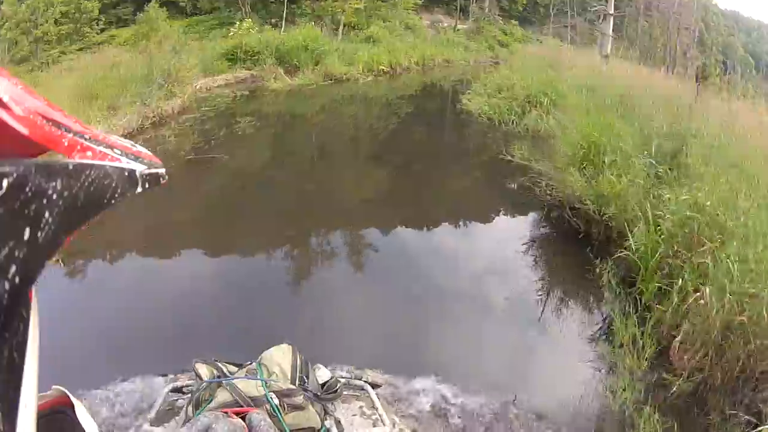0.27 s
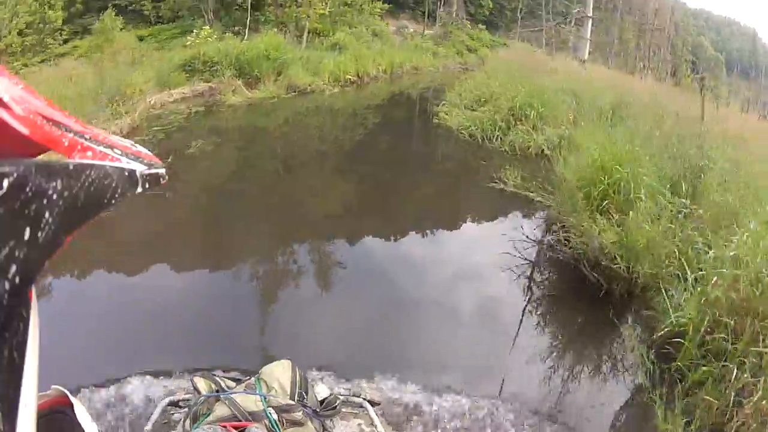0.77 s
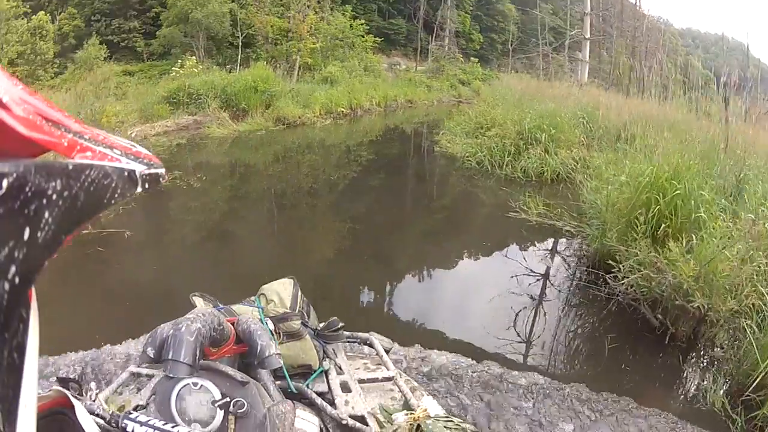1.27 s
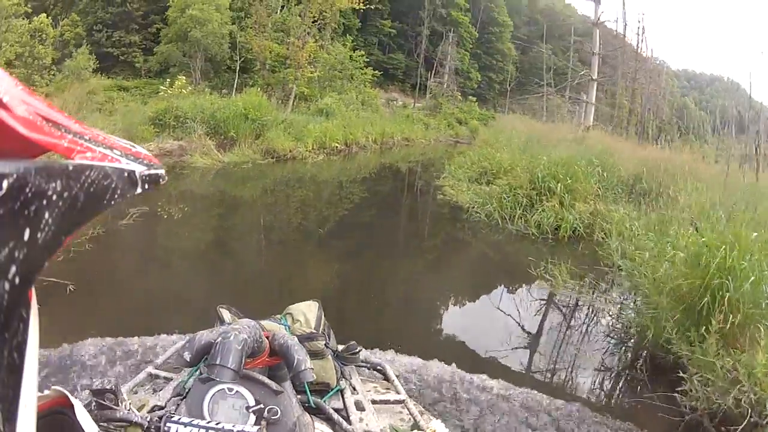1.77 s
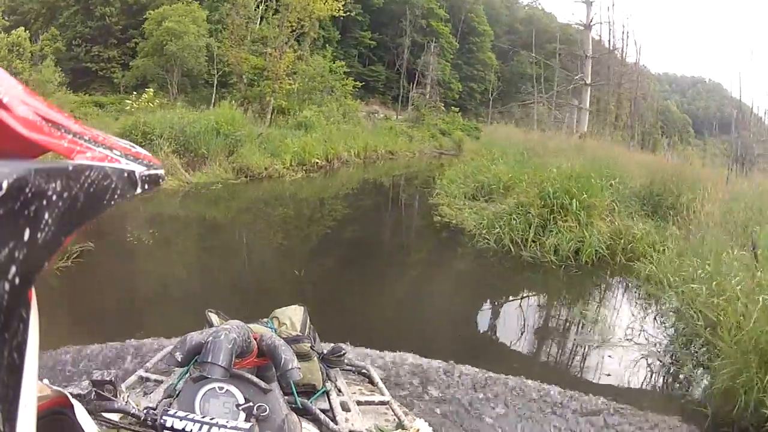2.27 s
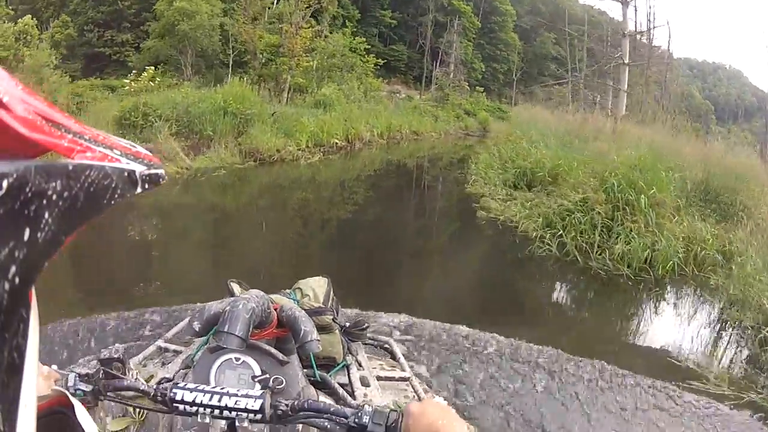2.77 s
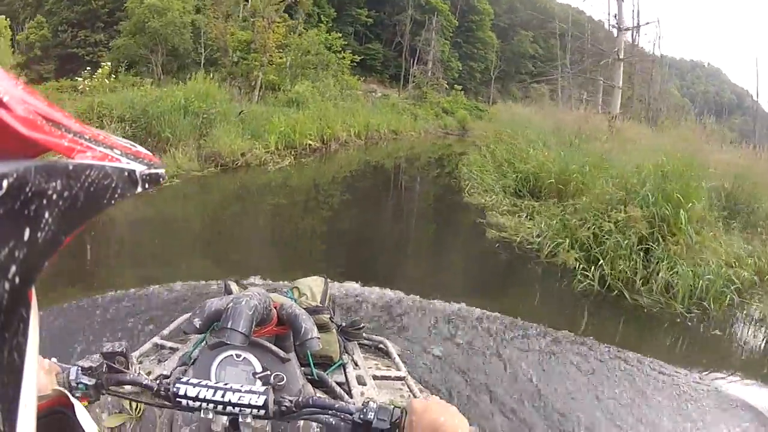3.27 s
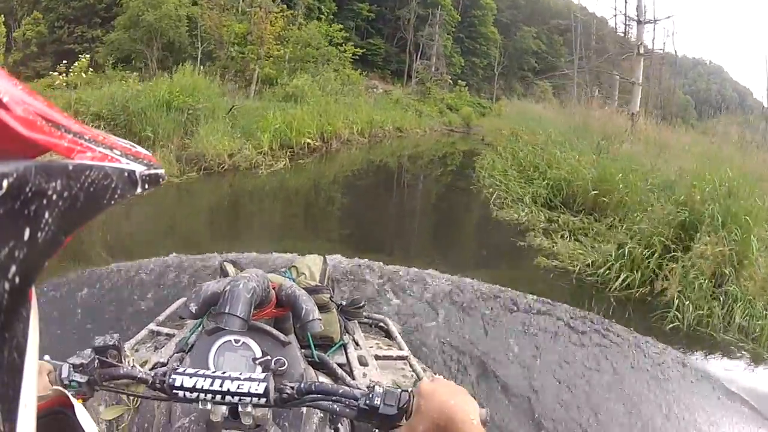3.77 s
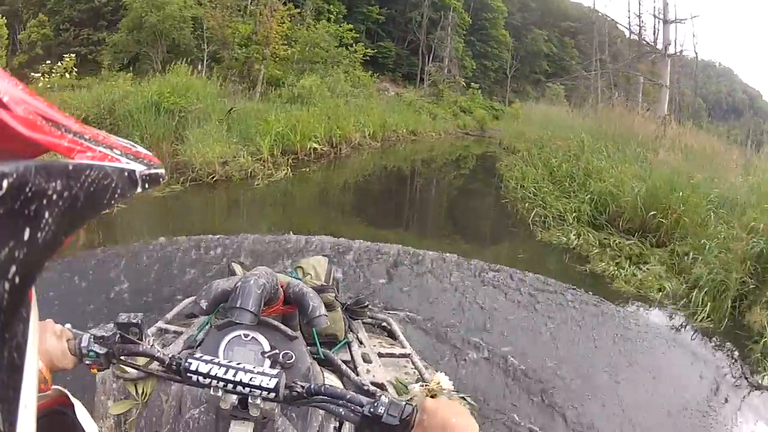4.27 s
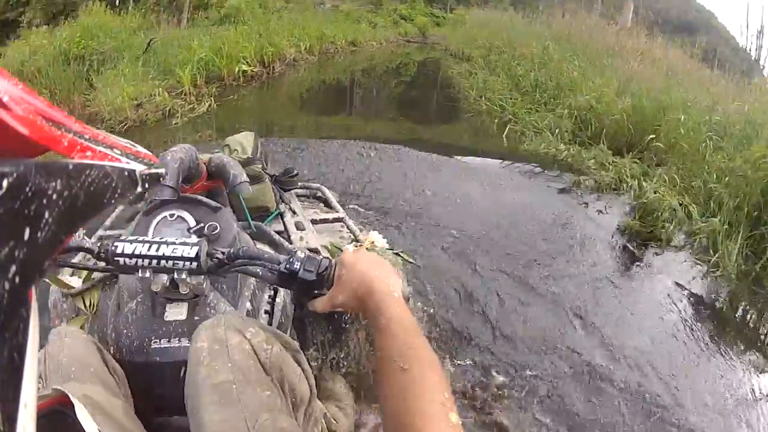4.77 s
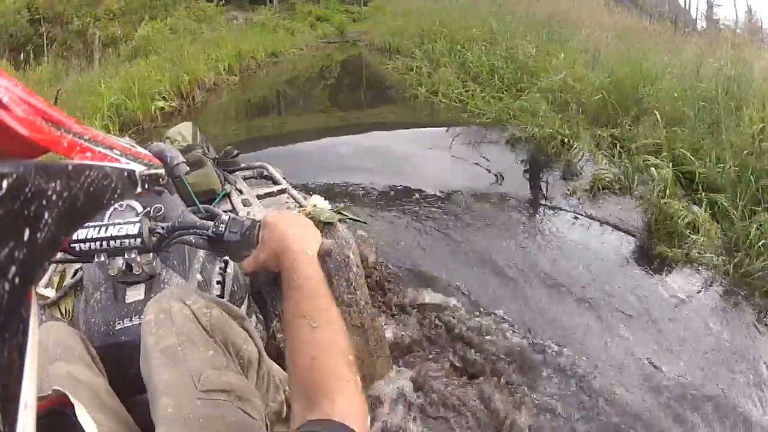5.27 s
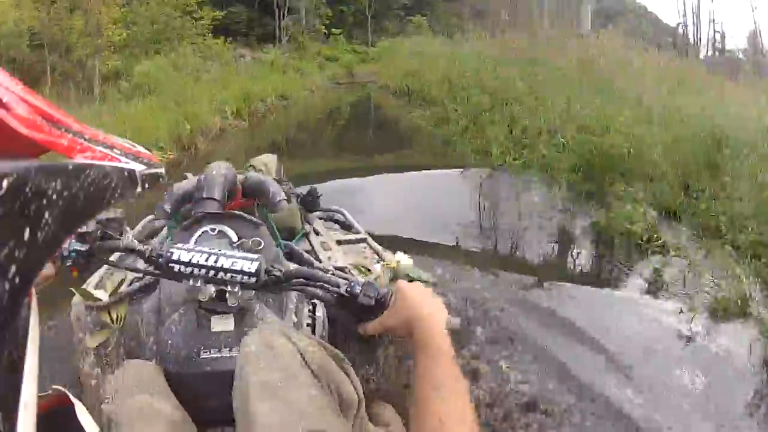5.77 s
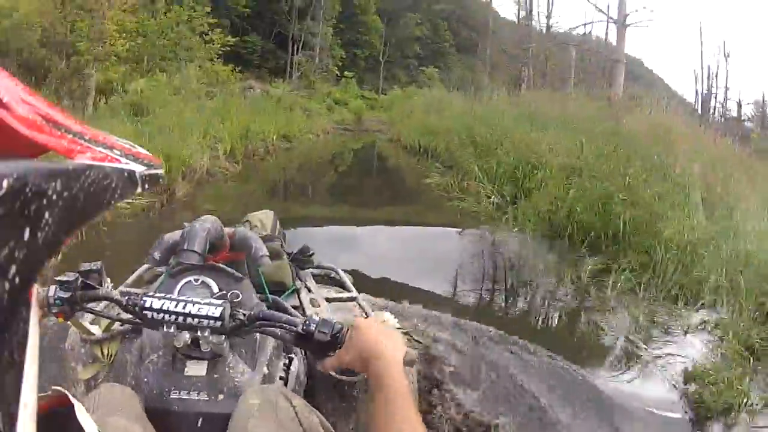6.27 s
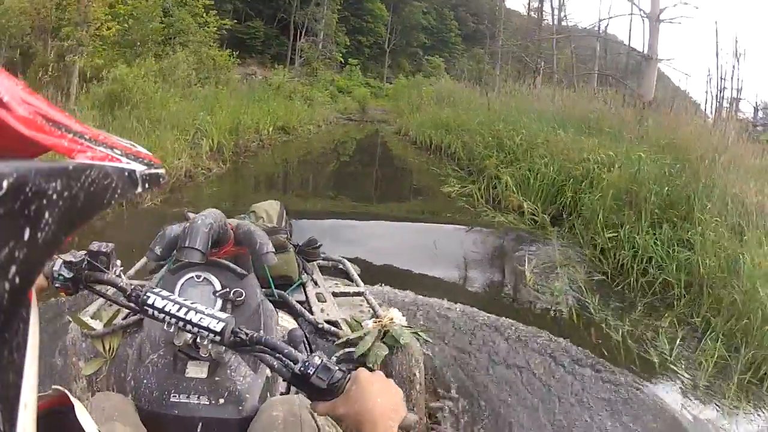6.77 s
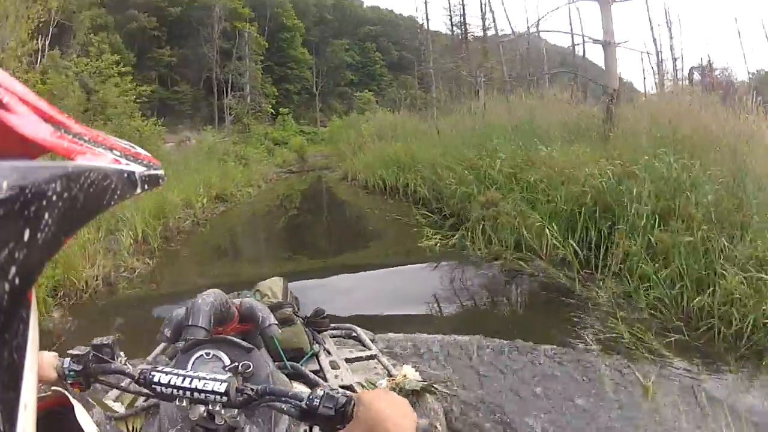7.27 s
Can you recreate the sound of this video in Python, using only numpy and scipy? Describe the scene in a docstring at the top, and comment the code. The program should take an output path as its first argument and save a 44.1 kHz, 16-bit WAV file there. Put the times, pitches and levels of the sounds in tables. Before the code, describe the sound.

A quad bike idles low, then revs up and pulls with a muffled drone through deep water, bow wave rushing and hissing around it.

```python
"""Quad bike in a flooded trail

A two-cylinder quad bike idles, then pulls under load through deep water, heard from a helmet camera in a
sealed case. Orders of the engine cycle make the exhaust drone, a wavering tone the gear whine, shaped noise
the wash and spray of the bow wave. A low shudder buffets the helmet and something taps the case.
The converter holds each sample, which mirrors the sound in the treble."""
import sys
import numpy as np
from scipy import signal
from scipy.fft import rfft, irfft, next_fast_len
from scipy.io import wavfile
from scipy.ndimage import uniform_filter1d, map_coordinates

SR = 44100
rng = np.random.default_rng(int(sys.argv[2]) if len(sys.argv) > 2 else 0)


def inscribe(sig):
    """Save sig as 16-bit PCM at rate SR to the path in sys.argv[1].

    A 1-D sig is mono; a 2-D sig holds one channel per row.
    Samples are clipped to [-1, 1] before scaling.
    """
    pcm = np.round(np.clip(np.atleast_2d(sig).T, -1, 1) * 32767)
    wavfile.write(sys.argv[1], SR, pcm.astype(np.int16))


N = 331632
T = np.arange(N) / SR  # time [s]

# engine: (time [s], four-stroke cycle rate [Hz], level [dB], extra level of orders 5 and 7 [dB])
ENGINE = [(0.0, 26.84, -43.5, -0.5), (0.8, 26.66, -42.0, -2), (1.5, 26.74, -40, -0.5),
          (1.74, 29.44, -38, 2), (2.05, 31.7, -40, 7), (2.3, 34.64, -39.5, 2.0), (2.51, 38.18, -42, -1.5),
          (2.64, 38.54, -38.5, -3), (2.97, 38.6, -36, -4.0), (3.16, 39.17, -36.5, -1),
          (3.42, 38.72, -35.5, -3.5), (3.68, 39.23, -35, 2), (4.0, 39.2, -34, 2), (4.45, 38.41, -33, -1.5),
          (4.88, 39.32, -34.0, 7.0), (5.05, 39.4, -32.5, 5.5), (5.2, 38.94, -34, 3.5),
          (5.53, 37.93, -34.5, 5), (5.76, 35.4, -34, -8), (5.9, 35.36, -32.5, -4),
          (6.22, 36.88, -34.5, -12), (6.45, 33.86, -35, 0), (6.7, 37.2, -36.5, -6.0),
          (6.93, 35.01, -35.5, -7), (7.2, 35.15, -37, -6), (7.52, 33.64, -38.5, 3)]


def amp(db):
    """Amplitude ratio of a level in dB: a factor of ten every 20 dB."""
    return 10 ** (np.asarray(db) / 20)


def unit(x):
    """Normalization: x scaled to an rms of 1."""
    return x / np.sqrt(np.mean(x ** 2) + 1e-20)


def along(points, hz):
    """Interpolation of (frequency [Hz], value) points on a logarithmic frequency axis."""
    f, v = np.transpose(points)
    return np.interp(np.log(hz + 1), np.log(f + 1), v)


def curves(rows):
    """Linear interpolation in time: one value per sample for each column after the time."""
    s, *cols = np.transpose(rows)
    return [np.interp(T, s, c) for c in cols]


def wobble(rate):
    """Slow random modulation: a spline through normal random knots, rate of them a second."""
    knots = rng.standard_normal(N // 100)
    return map_coordinates(knots, [T * rate])


def filtered(x, response):
    """Linear filtering: the spectrum of x times a response of frequency."""
    m = next_fast_len(N + SR // 2)
    hz = np.fft.rfftfreq(m, 1 / SR)
    return irfft(rfft(x, m) * response(hz), m)[:N]


def crank():
    """Phase as the integral of frequency: angle of the four-stroke cycle, a little unsteady."""
    cycle_hz = curves(ENGINE)[0] * (1 + 0.004 * wobble(14))
    return 2 * np.pi * np.cumsum(cycle_hz) / SR


def exhaust(angle):
    """Fourier synthesis: the firing pulses as orders (harmonics) of the cycle, shaped by pipe and muffler."""
    # what pipe and muffler pass: (frequency [Hz], gain [dB])
    muffler = [(50, -14), (70, -14), (79, -7.5), (100, -6), (135, 2), (160, 1), (175, 7.5), (186, 3.5),
               (197, 6.5), (212, 4), (230, 1.5), (260, 4), (290, 2.5), (322, 6.5), (350, 1), (400, -9),
               (640, -21)]
    # orders 2 to 16 of the cycle: (level at idle [dB], level under load [dB])
    orders_db = [(5.5, 2), (-5, 1.5), (1, 3.5), (4.5, -12), (-11.5, 0), (-14.0, -21.5), (-8.0, -27),
                 (-23.5, -19.5), (-26.5, -18), (-10.5, -13.5), (-13, -26.5), (-11.5, -13.5), (-22.5, -12),
                 (-7.5, -18.5), (-17.5, -14)]
    # extra level of orders 8 and up: (time [s], level [dB])
    rasp = [(0, 1), (1.4, 0), (1.75, 3.5), (1.97, 5.5), (2.08, 1.5), (2.4, 5.5), (2.7, -0.5), (3.5, -3.5),
            (4.7, -4), (5.4, 4), (5.9, -0.5), (6.4, -1), (7, 3.5), (7.52, -9.5)]
    node, resonance = (187, 4.1), (205.7, 11)  # of the pipe: (frequency [Hz], width [Hz])
    idle_below_hz, idle_fade_hz = 34, 7  # cycle rate where idle starts, and its span to full idle
    burst_late = 0.48  # delay of the burst of orders 10 and up [cycles]

    cycle_hz, level_db, odd_db = curves(ENGINE)
    idle = np.clip((idle_below_hz - cycle_hz) / idle_fade_hz, 0, 1)

    def turn(hz, centre, width):
        """Phase of a second-order resonance, which turns by pi across its centre."""
        return np.arctan2(hz * width, centre ** 2 - hz ** 2)

    def shift(k):
        """Phase dispersion: aligned orders make one pulse, scattered ones a blurred pulse."""
        if k > 9:
            return -2 * np.pi * k * burst_late
        apart = 1.84 * np.sin(2.3 * k)
        # orders below 7 drift apart only at a low cycle rate, orders 7 to 9 always
        return apart * np.clip((32 - cycle_hz) / 5, 0, 1) if k < 7 else apart

    def tone(k):
        """One harmonic of rms 1."""
        hz = k * cycle_hz
        # between the node and the resonance an order swings the other way
        lag = 2.1 + turn(hz, *node) - turn(hz, *resonance)
        return np.sqrt(2) * np.cos(k * angle + lag + shift(k))

    rasp_db = curves(rasp)[0] + 0.7 * wobble(24)
    drone = amp(-53.5 + 1.4 * wobble(3.96)) * tone(1)  # once a cycle
    for k, (idle_db, load_db) in enumerate(orders_db, start=2):
        db = level_db + idle * idle_db + (1 - idle) * load_db + along(muffler, k * cycle_hz)
        if k in (5, 7):
            db = db + odd_db
        if k > 7:
            db = db + rasp_db
        load_flicker_db = 0.4 if k in (2, 3, 4, 6) else 2.5
        flicker_db = 0.32 * wobble(18) + (1 - idle) * load_flicker_db * wobble(6)
        drone += amp(db + flicker_db) * tone(k)
    return drone


def whine(hz, db, waver_hz):
    """Random frequency and amplitude modulation: a wavering tone that breaks up."""
    level = amp(db + 1.6 * wobble(8) + 1.8 * wobble(30))
    phase = 2 * np.pi * np.cumsum(hz + waver_hz * wobble(30)) / SR
    return level * np.sqrt(2) * np.sin(phase)


def gears():
    """Tooth-meshing frequency: the whine is teeth per cycle times cycle rate; a whistle joins for a moment."""
    # final drive, behind a belt that shifts: (time [s], teeth per engine cycle, level [dB])
    gear_rows = [(1.7, 13.2, -62), (2.1, 14.5, -59.5), (2.3, 14.8, -49), (2.55, 15.1, -52),
                 (2.75, 15.5, -70), (3, 15.8, -57.5), (3.74, 16.1, -53), (4.15, 16.8, -54.5),
                 (4.47, 16.5, -55.5), (5.03, 17, -52), (5.45, 17.1, -57), (6.12, 16.5, -58.5),
                 (6.44, 15.4, -56), (6.7, 16.1, -54), (7.05, 16, -65), (7.33, 15.2, -56), (7.52, 15.4, -53)]
    # a thin fuzzy whistle as the pull sets in: (time [s], frequency [Hz], level [dB])
    whistle_rows = [(2.3, 2934, -74), (2.56, 2860, -52), (2.8, 2880, -55), (3.08, 2900, -52),
                    (3.2, 2910, -75)]

    def on(rows):
        """Gate: true between the first and last row."""
        return (T > rows[0][0]) & (T <= rows[-1][0])

    teeth, gear_db = curves(gear_rows)
    mesh_hz = teeth * curves(ENGINE)[0]
    gear_whine = on(gear_rows) * whine(mesh_hz, gear_db, waver_hz=7.06)
    whistle = on(whistle_rows) * whine(*curves(whistle_rows), waver_hz=12.6)
    return gear_whine + whistle


def case(hz):
    """Resonance and absorption: how the sealed case around the microphone colours the water."""
    # peaks and dips: (frequency [Hz], width [Hz], gain [dB])
    case_peaks = [(775, 25, 4), (799, 41, -6), (983, 50, 3.5), (1214, 33, -13), (1288, 44, 6.5),
                  (1547, 107, 6), (1750, 38, -18.5), (2420, 100, 4.5), (2650, 40, 5.5), (2853, 59, -2.5),
                  (3360, 110, 2.5), (4890, 160, 2.5)]
    return amp(sum(db * np.exp(-((hz - c) / w) ** 2 * 2) for c, w, db in case_peaks))


def rush(spectrum, patchy_db, grain_db):
    """Modulated band noise of rms 1: patches in time and frequency, and bursts where drops land."""
    z = signal.stft(rng.standard_normal(N + 512), nperseg=512)[2]
    field = uniform_filter1d(rng.standard_normal(z.shape), size=3, axis=0)  # smooth over frequency
    field = uniform_filter1d(field, size=14, axis=1)  # and over time
    noise = signal.istft(z * amp(patchy_db * unit(field)), nperseg=512)[1][:N]
    noise = noise * amp(grain_db * wobble(160))

    def response(hz):
        """Spectral shaping, with nothing outside the listed band."""
        inside = (hz > spectrum[0][0]) & (hz < spectrum[-1][0])
        return amp(along(spectrum, hz)) * case(hz) * inside

    return unit(filtered(noise, response))


def water(angle):
    """Turbulence noise: rumble and churn under the frame, wash and gush on the fenders, bow spray and fizz."""
    # water: (time [s], bow wave level [dB], surges along the fenders [dB])
    water_rows = [(0, -49.5, -0.5), (1, -49.5, -1), (1.5, -48.5, -1), (2, -46.5, -3), (2.4, -44, -2.5),
                  (2.7, -44, -1.5), (3.1, -44.5, -0.5), (3.45, -45, -0.5), (3.85, -44.5, 0),
                  (4.1, -45.5, -1), (4.45, -47, 5.5), (5.05, -44.5, 0), (5.75, -45.5, 4.5), (6, -46, 2.5),
                  (6.3, -46, 6), (6.75, -45.5, -0.5), (7.2, -45.5, 3), (7.52, -46, 1)]
    # spectra of the layers, each: (frequency [Hz], relative density [dB per Hz])
    rumble = [(8, -12), (30, -18), (50, -6), (150, 3), (260, -0.5), (400, -8), (500, -18)]
    churn = [(380, 4.5), (470, 2.5), (560, 3), (700, 3.5), (765, 2), (900, -5.5)]
    wash = [(700, -11.5), (850, -6), (1000, -1), (1300, -8), (1450, -8)]
    ringing = [(1020, -9), (1065, -8), (1090, 2.5), (1115, 1), (1160, -21)]  # a fender rings in the wash
    gush = [(1250, -7.5), (1380, -7), (1500, 1.5), (1700, 4.5), (1800, -0.5), (1950, -20)]
    spray = [(1600, -10.5), (1850, -1), (2300, 1), (2700, -3.5), (2900, -3.5), (3200, -26)]
    fizz = [(2700, -37), (3000, -4), (3800, -1.5), (4050, -10), (4500, -8.5), (5300, -4.5), (5700, -13.5),
            (6000, -18)]

    wave_db, surge_db = curves(water_rows)
    engine_db = curves(ENGINE)[1]
    slosh = wobble(7)
    throb = np.cos(2 * angle) + 0.28 * np.cos(angle)  # both firings shake the frame, one harder

    def level(db, grows, surge_share):
        """Power law: db holds at a bow wave of -45 dB without surge; grows is dB per dB of wave."""
        return db + grows * (wave_db + 45) + surge_share * surge_db

    rumble_db = -44 + 0.62 * (engine_db + 32.5)  # follows the engine level
    churn_db = level(-53.5, grows=1.06, surge_share=0.37) + 0.1 * slosh
    wash_db = level(-49.5, grows=0.72, surge_share=0.18) + 0.2 * slosh + 0.64 * throb
    ring_db = level(-53, grows=1.46, surge_share=0.44) + 0.85 * wobble(3.58)
    gush_db = level(-50, grows=1.93, surge_share=1.01) + 0.15 * slosh + 0.76 * throb
    spray_db = level(-45.5, grows=0.99, surge_share=-0.1) + 0.36 * slosh + 0.16 * throb
    fizz_db = level(-50, grows=1.16, surge_share=0.33) + 0.96 * slosh + 0.25 * throb
    return (amp(rumble_db) * rush(rumble, patchy_db=2.5, grain_db=1.5)
            + amp(churn_db) * rush(churn, patchy_db=1.5, grain_db=1.0)
            + amp(wash_db) * rush(wash, patchy_db=0.36, grain_db=1.6)
            + amp(ring_db) * rush(ringing, patchy_db=0.5, grain_db=3.0)
            + amp(gush_db) * rush(gush, patchy_db=0.5, grain_db=0.6)
            + amp(spray_db) * rush(spray, patchy_db=0.66, grain_db=0.5)
            + amp(fizz_db) * rush(fizz, patchy_db=0.1, grain_db=0.96))


def ticks():
    """Modal synthesis: something taps the case and bounces, each contact a noise crack and damped modes."""
    # contacts: (time [s], gain [dB])
    contacts = [(.9495, -39), (.9535, -41), (.958, -47)]
    # modes of a tap: (frequency [Hz], level [dB], time to decay by 60 dB [s])
    tap_modes = [(452, -1.5, 0.026), (650, 7, 0.019), (1000, 1, .03), (1270, 0, .02), (2300, 1, .012)]
    crack_db, crack_t60 = 14, 0.006  # level before smoothing, and time to decay by 60 dB [s]
    out, t = np.zeros(N), T[:SR // 20]
    for s, db in contacts:
        crack = uniform_filter1d(rng.standard_normal(len(t)), size=7)
        ring = amp(crack_db - 60 * t / crack_t60) * crack
        for hz, mode_db, t60 in tap_modes:
            decay_db = mode_db + rng.normal(0, 1.8) - 60 * t / t60
            ring += amp(decay_db) * np.sin(2 * np.pi * hz * t)
        soft_onset = 1 - np.exp(-t / 0.0004)
        out[round(s * SR):][:len(t)] += amp(db) * ring * soft_onset
    return out


def buffet():
    """Amplitude modulation: the helmet shudders at the bottom of hearing, harder at each jolt."""
    # jolts of the helmet: (time [s], rms level at the height of the jolt [dB], length [s])
    jolt_rows = [(.08, -44, 0.053), (1.28, -40, 0.1), (1.88, -51, 0.16), (2.3, -51, .08), (2.88, -43, .15),
                 (3.27, -49, 0.092), (4.15, -47, 0.16), (4.63, -47, .15), (5.66, -52, 0.064),
                 (5.87, -47, 0.11), (7.06, -51, .2), (7.44, -51, 0.063)]
    shudder_hz = 21 + 1.5 * wobble(4)
    shudder = np.sqrt(2) * np.sin(2 * np.pi * np.cumsum(shudder_hz) / SR)
    jolts = sum(amp(db) * np.exp(-((T - s) / length) ** 2) for s, db, length in jolt_rows)
    return (amp(-60 + 2.5 * wobble(7)) + jolts) * shudder


def scene():
    """Superposition: everything the microphone hears, as one channel."""
    angle = crank()
    return (exhaust(angle) + gears() + water(angle) + ticks() + buffet())[None]


def record(dry):
    """Sample-and-hold imaging: each tone gains mirror tones around the hold rate, under a sinc rolloff."""
    hold_hz, top_hz = 12000, 15250  # hold rate, and the highest frequency passed
    sampled = dry[0] * (1 + 2 * np.cos(2 * np.pi * hold_hz * T))  # only the first pair of images
    return filtered(sampled, lambda hz: np.sinc(hz / hold_hz) * (hz < top_hz))[None]


dry = scene()
out = record(dry)
inscribe(out)
```